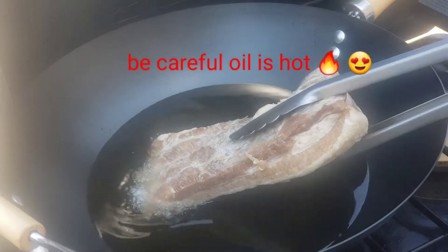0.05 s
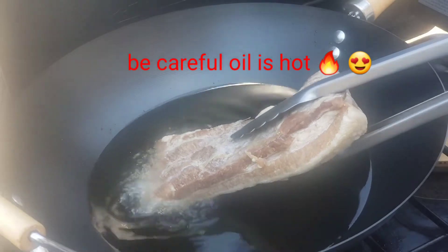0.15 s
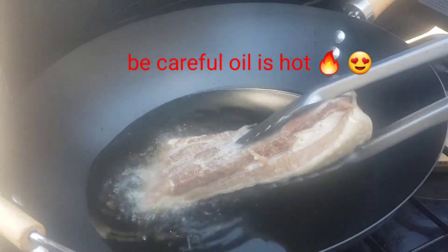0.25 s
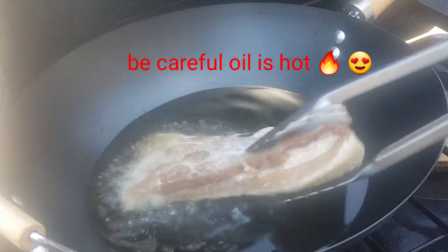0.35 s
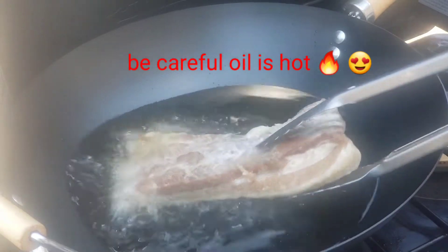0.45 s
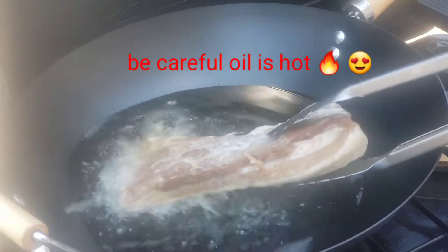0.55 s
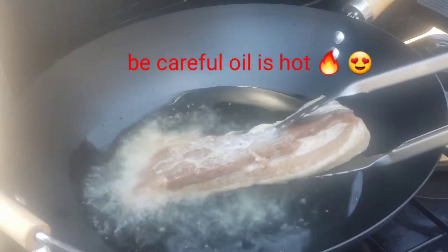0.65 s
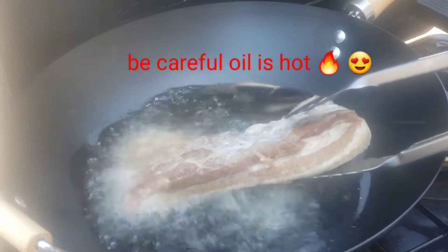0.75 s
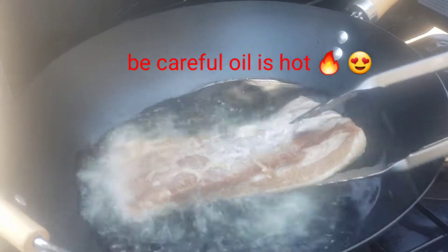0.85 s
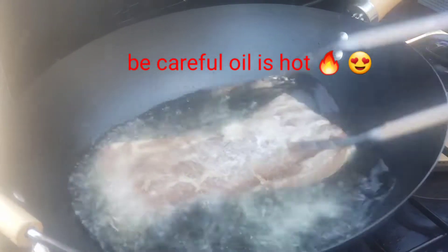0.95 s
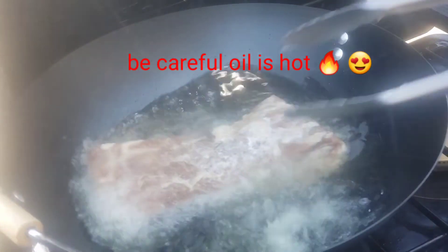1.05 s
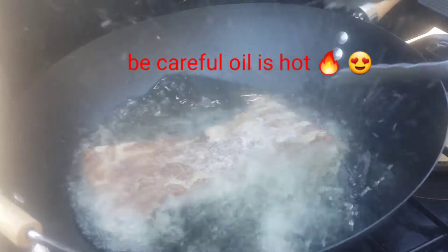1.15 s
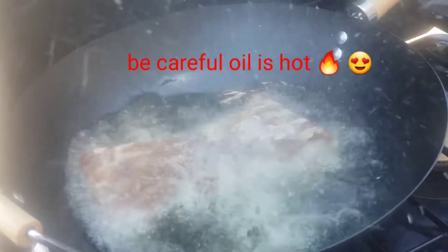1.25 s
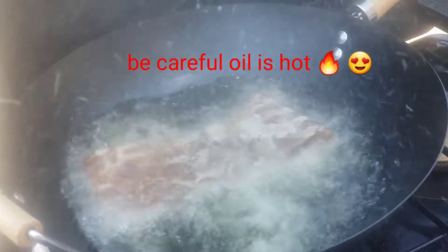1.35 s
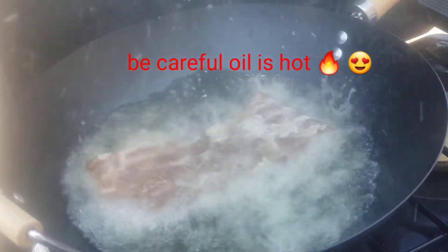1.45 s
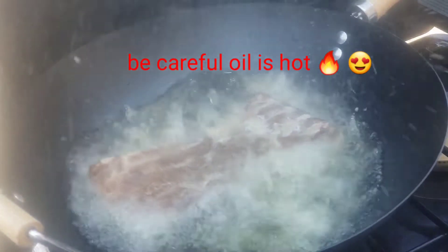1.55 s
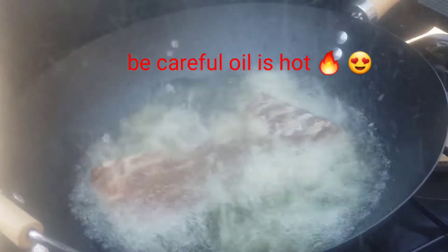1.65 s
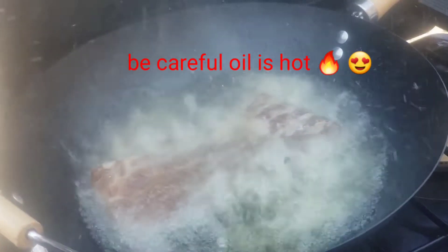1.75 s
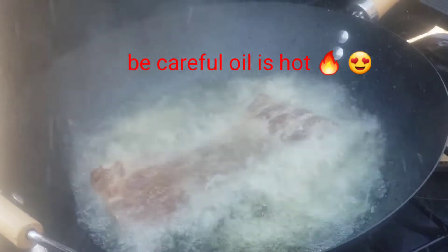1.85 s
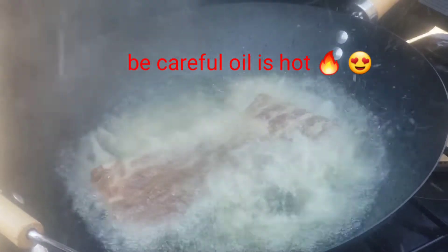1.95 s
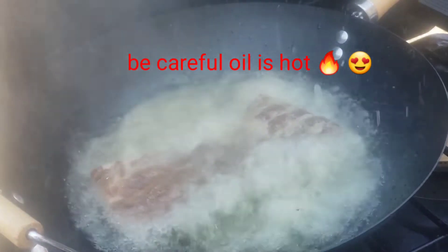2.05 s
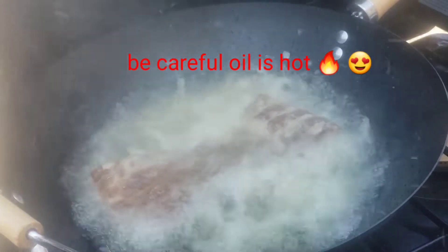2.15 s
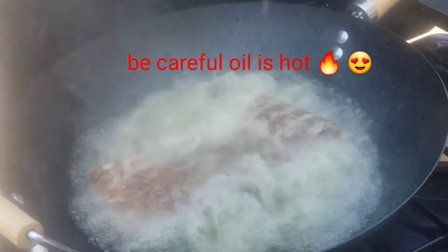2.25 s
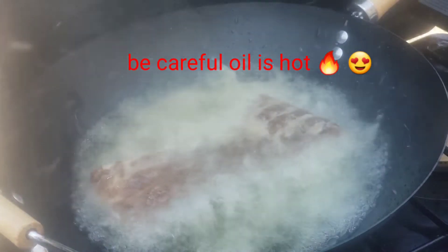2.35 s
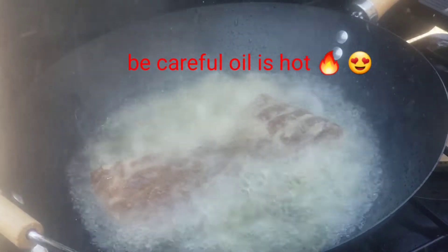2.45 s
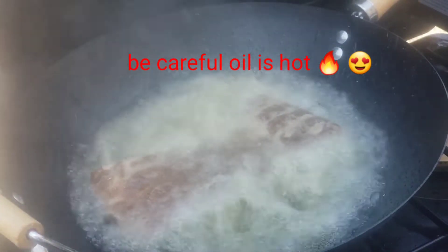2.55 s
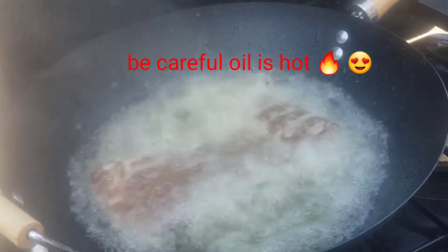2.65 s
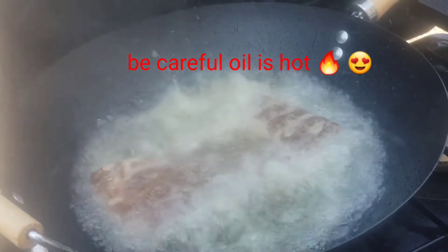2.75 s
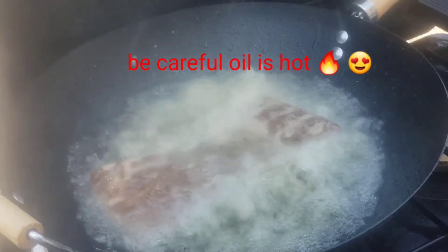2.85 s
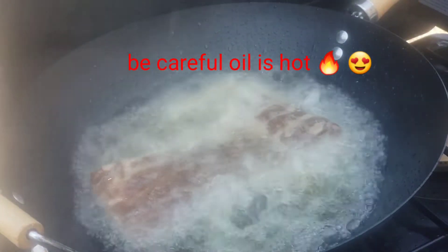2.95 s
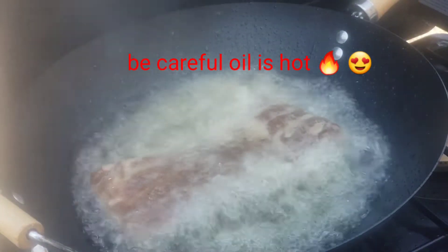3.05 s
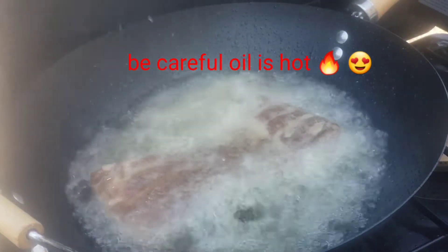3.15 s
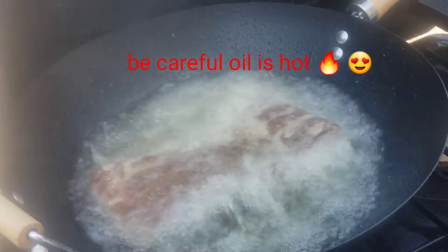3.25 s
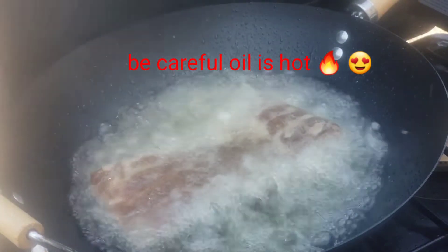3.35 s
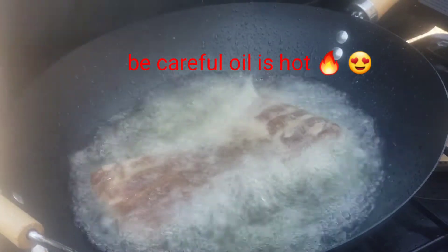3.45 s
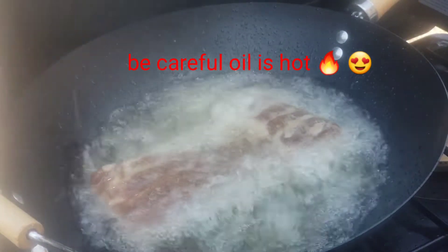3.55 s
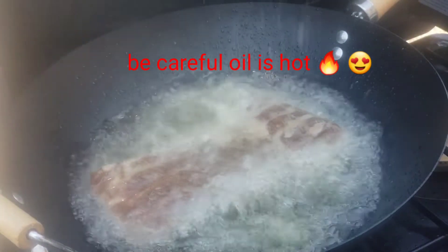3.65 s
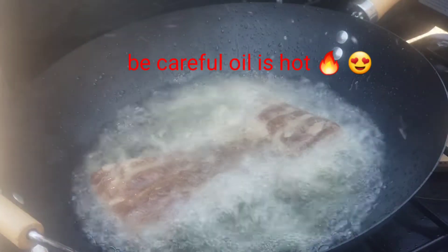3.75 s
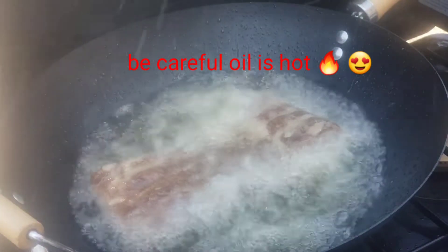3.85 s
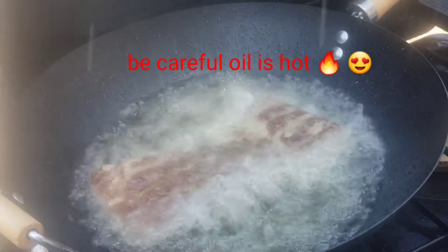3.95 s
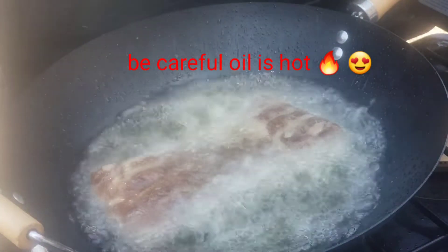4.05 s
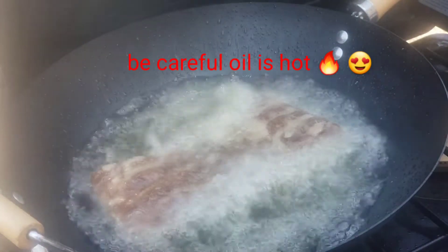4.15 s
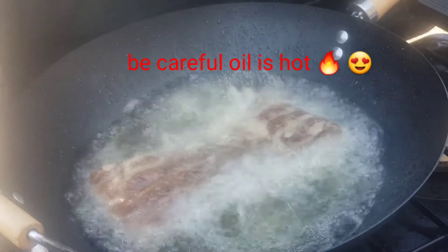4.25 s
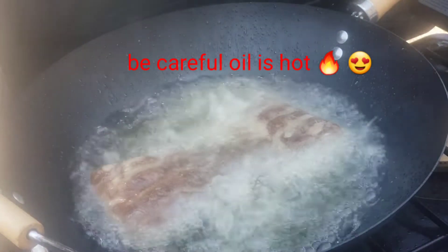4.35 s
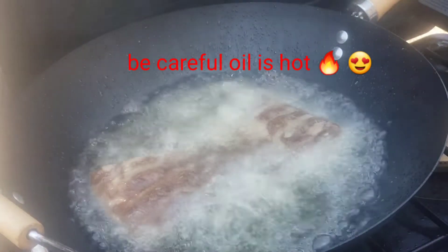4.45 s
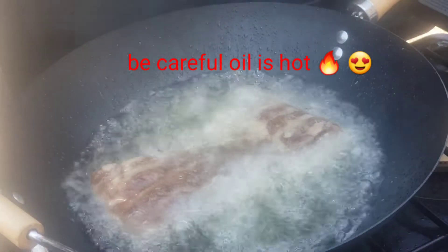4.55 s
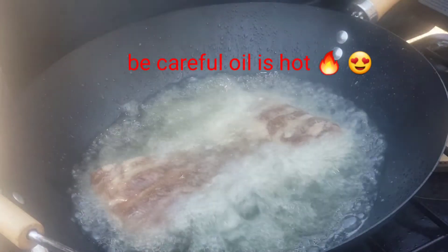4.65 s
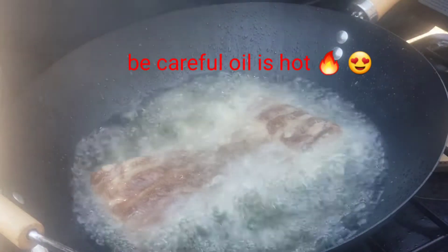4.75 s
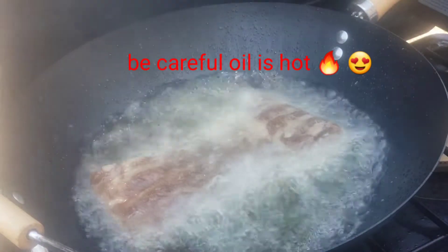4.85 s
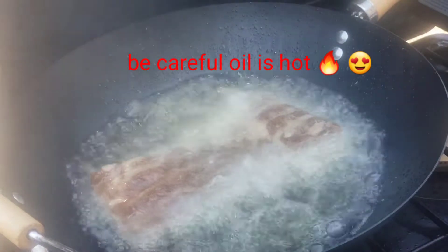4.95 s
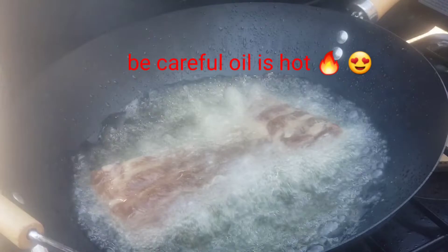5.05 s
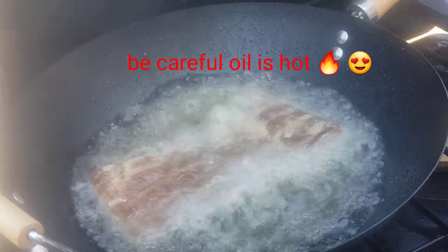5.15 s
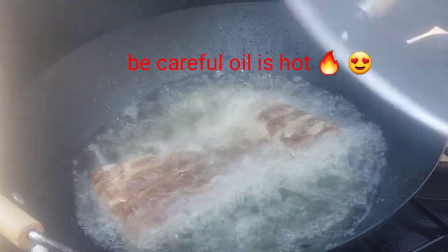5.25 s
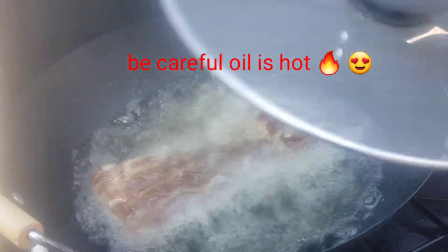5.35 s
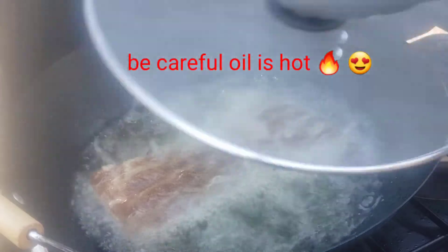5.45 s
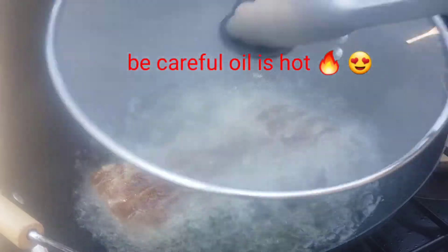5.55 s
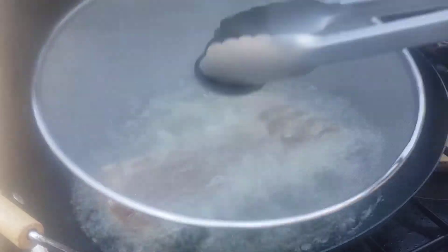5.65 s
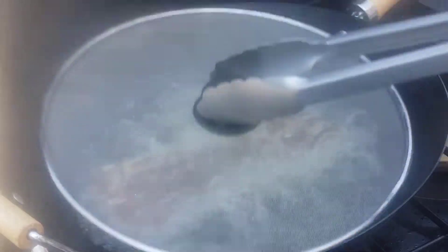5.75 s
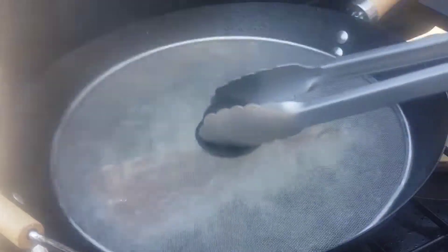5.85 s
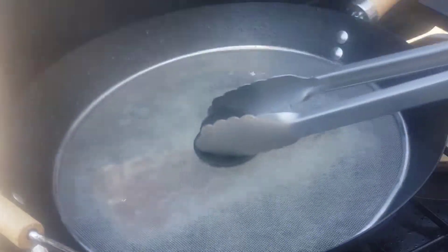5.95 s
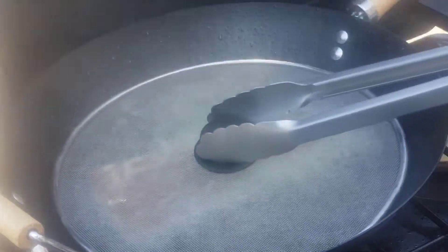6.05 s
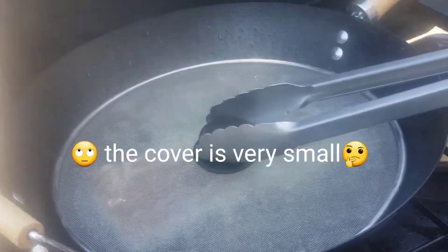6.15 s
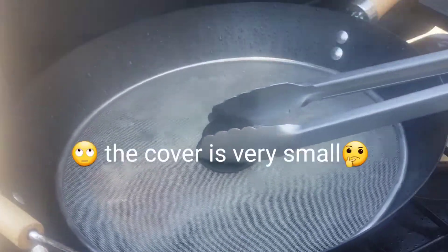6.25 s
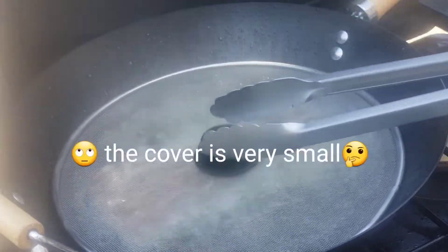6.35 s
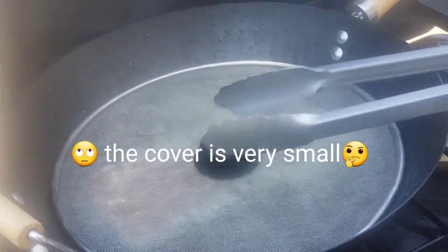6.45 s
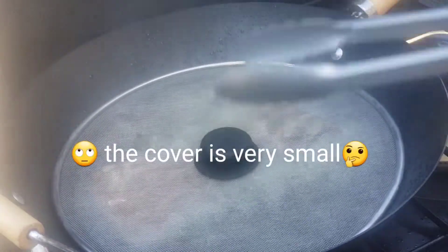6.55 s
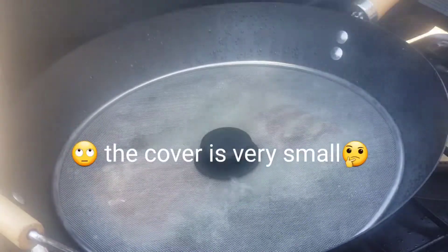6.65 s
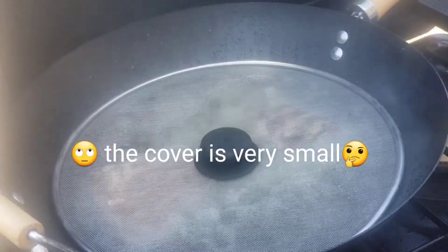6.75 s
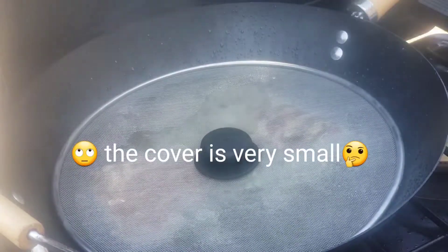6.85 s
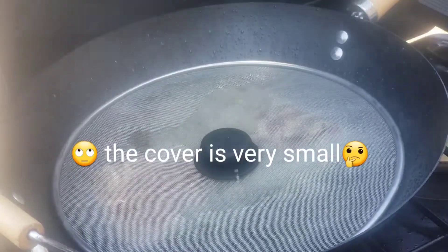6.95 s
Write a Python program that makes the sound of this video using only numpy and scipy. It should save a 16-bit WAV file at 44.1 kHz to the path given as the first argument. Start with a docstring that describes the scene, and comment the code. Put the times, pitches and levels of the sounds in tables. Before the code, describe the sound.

Close-miked frying in a small home kitchen. Hot oil hisses as wet pork touches it, then sizzles hard with dense high fizz and quick bubbling. The boil grows lower and rougher, with bright cracks and small low thumps from flying droplets. It then steadily dries out, leaving soft sizzle, single ringing pops, sharp snaps and a faint puff of low air rumble near the end.

```python
"""A wet slab of pork, lowered into a wok of hot oil close to the microphone, sizzles as its water boils.
The bright sizzle, built of noise, steam jets and swarms of decaying bubble tones, swells into a rolling
boil, then thins to single pops (ringing cavities with spray) and snaps (very short bursts of droplets).
The wok's resonances colour the frying, a small kitchen adds a short tail and air rumbles by the stove.
A few flying droplets thump on the microphone, and a limiter holds down the sharpest snaps."""
import sys
import numpy as np
from scipy import signal
from scipy.fft import rfft, irfft, next_fast_len
from scipy.io import wavfile
from scipy.ndimage import uniform_filter1d, minimum_filter1d, map_coordinates

SR = 44100
rng = np.random.default_rng(int(sys.argv[2]) if len(sys.argv) > 2 else 0)


def generate_wav(sig):
    """Save sig (samples, or channels by samples) to the path in sys.argv[1] as 16-bit PCM at SR."""
    pcm = np.round(np.clip(np.atleast_2d(sig).T, -1, 1) * 32767).astype(np.int16)
    wavfile.write(sys.argv[1], SR, pcm)


N = 308259  # samples

# Every level below is relative: each source adds its own offset.
# How hard the oil works: time_s, deep_boil_db, bubbling_db, fizz_db
OIL_ACTIVITY = [(0.0, -51, -26, -24.5), (0.17, -46, -39, -22), (0.51, -44.5, -33, -19.5),
                (0.59, -39, -21.5, -18.5), (0.8, -48, -20, -18), (1.0, -39, -23.5, -19),
                (1.3, -33, -20.5, -20), (1.65, -28, -20, -19.5), (1.93, -28.5, -21.5, -20),
                (2.3, -31.5, -23.5, -23.5), (2.52, -28, -21.5, -23), (2.92, -35, -23, -25),
                (3.25, -46, -30.5, -24.5), (3.62, -44, -26.5, -27.5), (4.17, -44.5, -34.5, -29.5),
                (4.83, -46.5, -36, -31), (5.3, -48, -33, -30.5), (5.66, -47.5, -43, -28),
                (6.01, -47.5, -38, -31.5), (6.99, -48, -43, -31.5)]
# Bubbles grow as the meat sinks and come more singly as it dries: time_s, pitch_hz, relative_scatter_db
FOAM_BUBBLES = [(0, 3030, -3), (.35, 2550, 0.5), (.8, 2110, 3.5), (1.5, 1860, 3), (2.7, 1514, 5),
                (3.6, 1980, 3.5), (5, 2010, 8), (7, 2280, 4.5)]
# The strongest steam jets spitting through the foam: start_s, level_db, pitch_hz
STEAM_JETS = [(0.2613, -6.5, 3400), (0.816, 2, 2580), (0.87, -10, 2760), (3.3277, -12.5, 2700),
              (3.4444, -15, 3450), (5.191, -12.5, 3000), (5.6068, -17.5, 3280), (6.3648, -13, 3340),
              (6.8833, -15.5, 2970)]
# The largest steam bubbles bursting: start_s, level_db, pitch_hz, spray_db (on top of level), life_cycles
BIG_BUBBLES = [(0.296, -5, 2200, -13, 17), (0.408, -13, 2010, -0.5, 17), (0.4233, 3, 2580, -19, 8.7),
               (0.4495, -8, 1890, -17, 19), (0.4643, -1, 2380, -28, 17), (0.5803, -12, 1210, -3, 22),
               (0.6542, -7, 2020, -7, 12), (0.7496, -6, 1220, -4, 21), (0.7835, 2, 1990, -10, 8),
               (0.8405, -14, 1700, 3, 11), (0.915, -9, 1620, -13, 21), (0.9977, 2.5, 1330, 0, 17),
               (1.0672, -8, 1240, -4, 21), (1.2246, -8, 1070, -11, 9.6), (1.6571, -11, 660, -7, 8.3),
               (1.8927, -8, 650, -8, 5.9), (1.9111, -9.5, 680, -7, 7.9), (1.9933, 3, 1210, -9, 7.8),
               (2.277, -13, 1680, 6, 7.2), (2.5654, -2, 1100, -16, 7.4), (2.6137, -4, 1070, -22, 13),
               (2.7251, -7, 1140, -11, 17), (2.8287, -6, 1120, -18, 10), (3.071, -1, 890, -11, 6.1),
               (3.0973, -8.5, 1420, -4, 6.5), (3.256, -6.5, 663, -8, 7.1), (3.4909, -13, 1500, -3.5, 7.6),
               (3.5168, -9, 1390, -4.5, 9), (3.5487, -12, 1500, -12, 14), (3.6674, -10.5, 840, -8, 10),
               (3.988, -13.5, 1120, -0.5, 23), (4.0531, -12, 850, -16, 5.3), (4.111, -13.5, 1900, -5.5, 9),
               (4.1456, -12, 1420, -8, 9), (4.2935, -14.5, 1045, -13, 23), (4.3173, -4.5, 760, -12, 7),
               (4.333, -2, 500, -8.5, 8.8), (4.3572, -12, 1380, -5, 9.2), (4.5183, -9, 1020, -6.5, 7.2),
               (4.5965, -8.5, 1300, -12, 9.7), (4.6042, -8.5, 746, -5, 12), (4.7988, -13, 1200, -4.5, 11),
               (4.8224, -16.5, 676, -3.5, 11), (4.9617, -2, 1160, -13.5, 2.8), (5.062, -7, 1220, -8, 11.4),
               (5.1056, -10.5, 1860, -8, 14), (5.2474, -14, 1164, 1.5, 22), (5.4235, -10.5, 950, -18, 8.1),
               (5.4495, -10, 2600, -20, 18), (5.4865, -10.5, 1144, -6.5, 16),
               (5.7868, -5.5, 1000, -12.5, 8.8), (5.883, -19, 1560, 1.5, 11), (6.0006, -7, 1280, -10, 3.5),
               (6.092, -12, 1400, -7.5, 6.1), (6.1355, -14, 1750, -13, 9.8), (6.1744, -16, 1400, -7, 14),
               (6.3557, -17, 950, -20, 10.5), (6.4089, -9, 760, -9, 15), (6.4663, -9, 1360, -10.5, 21),
               (6.5274, -3.5, 1050, -14, 17), (6.63, -16.5, 1910, 0.5, 12), (6.688, -8.5, 1190, -4.5, 19),
               (6.81, -6.5, 1150, -6.5, 16), (6.9511, -9, 1900, -7.5, 18)]
# The loudest water droplets exploding at the surface: start_s, level_db, pitch_hz
BURSTING_DROPLETS = [(0.277, -3, 8350), (0.7982, -5, 6860), (1.1915, 8, 7600), (1.2667, 11, 8200),
                     (1.3085, 9, 7900), (1.3576, -7, 6100), (1.8037, 7, 6740), (1.9432, 5, 7900),
                     (2.3112, -2, 4800), (2.3673, -5, 5500), (2.4522, 5, 7600), (2.534, -3, 5850),
                     (2.8545, -5.5, 6440), (2.8837, 3, 7650), (3.2346, -5, 7500), (3.4363, -2, 6200),
                     (4.0292, -10, 7940), (4.0372, -9, 7700), (4.1286, -10.5, 6250), (4.2061, -8, 8500),
                     (4.4738, -12, 8040), (4.5418, -11, 7640), (4.7861, -9.5, 7540), (5.3589, -8, 10700),
                     (5.406, -8, 11100), (5.5001, -12.5, 4380), (5.5197, -4, 10000), (5.556, -12, 5600),
                     (6.0095, 1, 6900), (6.0276, -11.5, 7450), (6.1728, -3, 7300), (6.3243, -13.5, 5430),
                     (6.394, -6, 8450), (6.5034, -2, 6300), (6.7197, -13, 7500), (6.7654, -9, 7300),
                     (6.7782, -2, 7940)]
# Flying droplets that land on the microphone: start_s, thump_db
DROPLET_IMPACTS = [(0.556, -37), (1.178, -33), (1.272, -36), (1.359, -40), (1.944, -37), (2.039, -37),
                   (2.403, -35), (2.855, -24.5), (2.884, -36), (3.235, -43), (3.436, -41), (4.038, -32),
                   (4.786, -42), (5.517, -38), (6.01, -35)]
# Rumble of the air around the stove: time_s, level_db
AIR_LEVEL = [(0.0, -67), (0.21, -72), (2.1, -61), (3.56, -83), (5.98, -64), (6.13, -64), (6.64, -51),
             (6.99, -67.5)]

# Spectra of the steam hiss, fine fizz, deep boil and air rumble: frequency_hz, gain_db
HISS_SPECTRUM = [(100, -43), (400, -8.5), (750, -22), (1100, -4.5), (2000, 0), (2800, 3.5), (3500, 1),
                 (4400, 4), (6000, 0), (8200, 0), (10000, -11.5), (12500, -17), (15500, -35)]
FIZZ_SPECTRUM = [(300, -18), (1000, -17), (2000, 5), (3000, -16), (4400, -8), (6000, 2), (8200, 3),
                 (10000, -1.5), (12500, -14), (15500, -30)]
BOIL_SPECTRUM = [(20, -36), (70, -4.5), (160, -4), (350, -6), (560, -4.5), (800, -1.5), (1200, 4.5),
                 (2500, -20), (8000, -45)]
RUMBLE_SPECTRUM = [(15, -8), (35, 0), (62, 5), (85, -0.5), (120, -12), (250, -18), (600, -25), (3000, -60)]
# Colour of the steam wisp behind a snap: frequency_hz, gain_db
WISP_SPECTRUM = [(200, -33), (1000, -4.5), (2000, -5), (4400, -2.5), (8200, 7.5), (10000, -0.5),
                 (12500, -8.5), (15500, -34)]
# Colours of the spatter, the burbling foam, a pop's ring and its spray: frequency_hz, gain_db
SPATTER_SPECTRUM = [(500, -14), (4000, 0.5), (9000, -4.5)]
BURBLE_SPECTRUM = [(250, -17.5), (750, -4.0), (1100, -4.0)]
CAVITY_SPECTRUM = [(120, -11), (330, -3), (550, 0)]
SPRAY_SPECTRUM = [(200, -9.5), (1500, 17.5), (5000, 10.0), (8000, 4.5), (15000, -28)]

# Resonances of the wok and the air in its bowl: centre_hz, width_hz, level_db
WOK_MODES = [(460, 70, -20), (588, 112, -1), (1155, 170, -7), (4350, 78, -11)]
# How long the kitchen rings, by frequency: frequency_hz, t60_s
KITCHEN_DECAY = [(200, 0.4), (1200, 0.13), (5000, 0.064), (15000, 0.093)]

TOP_HZ = 15750  # upper band limit
SUNK_S = 0.55  # the meat goes under and the oil starts to bubble


def sizzle():
    """Vaporisation: steam leaves in spurts; tiny bubbles fizz, larger ones burble, the largest churn the oil."""
    boil_db, bubble_db, fizz_db = curves(OIL_ACTIVITY)
    spurt = wobble(rate=170)
    # the finest fizz and the spatter need a wet surface, so they fade faster than the hiss
    wet_db = fizz_db + 0.45 * (fizz_db + 20)
    layers = hiss(spurt, fizz_db) + fizz(spurt, wet_db) + spatter(wet_db)
    layers = layers + bubbles(spurt, bubble_db) + boil(boil_db)
    return layers + sputter(count=1300) * amp(fizz_db - 3.5)


def hiss(spurt, fizz_db):
    """Turbulence: escaping steam makes broadband noise, uneven in time and frequency."""
    steam = unit(patchy(coloured(rng.standard_normal(N), HISS_SPECTRUM), depth_db=3.0))
    flutter = amp(0.9 * spurt + 1.8 * wobble(rate=53))
    return steady(steam * flutter) * amp(fizz_db - 1.83)


def fizz(spurt, wet_db):
    """Resonance of tiny bubbles: a dense swarm of high tones merges into a fizz."""
    crackle = swarm(7000, octaves=1.5, life=9.9, scatter_db=6.5, count=14000, size=40)
    return steady(coloured(crackle, FIZZ_SPECTRUM) * amp(2.8 * spurt)) * amp(wet_db - 6.5)


def spatter(wet_db):
    """Impulsive radiation: sparse, quickly damped high tones are heard as ticks."""
    ticks = swarm(8400, octaves=0.62, life=3.8, scatter_db=2.5, count=560, size=60)
    return coloured(ticks, SPATTER_SPECTRUM) * amp(wet_db - 4.5)


def bubbles(spurt, bubble_db):
    """Bubble resonance: the larger the bubble, the lower its pitch, so growing foam burbles lower."""
    bubble_hz, scatter_db = curves(FOAM_BUBBLES)
    burble = swarm(bubble_hz, octaves=1.074, life=13.7, scatter_db=0.69 * scatter_db, count=5000, size=400)
    burble = coloured(burble, BURBLE_SPECTRUM)
    return steady(burble * amp(1.8 * spurt + 2.7 * wobble(rate=96))) * amp(bubble_db - 2.5)


def boil(boil_db):
    """Bubble resonance at large size: low, strongly damped tones churn the oil."""
    scatter_db = curves(FOAM_BUBBLES)[1]
    churn = swarm(644, octaves=1.34, life=5.0, scatter_db=0.81 * scatter_db, count=2400, size=700)
    return steady(coloured(churn, BOIL_SPECTRUM)) * amp(boil_db)


def sputter(count):
    """Jet noise: many small steam jets sound, each at a pitch of its own."""
    s = rng.uniform(0, N / SR, count)
    hz = np.minimum(4200 * 2 ** (0.64 * rng.standard_normal(count)), 8500)
    strength = amp(3.0 * np.minimum(rng.exponential(size=count), 3))
    jets = strength[:, None] * jet(hz, swell=0.00094, width=0.57)
    return steady(place(s, jets), size=12000)


def spits():
    """Jet noise: stronger steam jets stand out of the sizzle."""
    s, db, hz = np.vstack([STEAM_JETS, small_spits(count=90)]).T
    return place(s, amp(db - 2)[:, None] * jet(hz, swell=0.0012, width=0.96))


def pops():
    """Cavity resonance: a big bubble tears open with a tick, rings for a few cycles and throws a short spray."""
    s, db, hz, spray_db, life = np.vstack([BIG_BUBBLES, small_pops(count=80)]).T
    t = np.arange(3600) / SR
    tone = ring(hz, life, onset=0.5, rise=0.018, size=len(t)) * amp(db + 6)[:, None]
    # the spray dies over milliseconds, the tick much faster
    decay = np.exp(-t / 0.0039) + 1.03 * np.exp(-t / 0.00031)
    tear = rng.standard_normal(tone.shape) * decay * amp(db + spray_db - 6.5)[:, None]
    spray = filtered(place(s, tear), lambda hz: amp(along(SPRAY_SPECTRUM, hz)))
    cavity = filtered(place(s - 0.0002, tone), lambda hz: amp(along(CAVITY_SPECTRUM, hz)))
    return cavity + spray


def snaps():
    """Explosive boiling: a droplet bursts in a brief crack, sharper at higher pitch, trailing a wisp of steam."""
    s, db, hz = np.vstack([BURSTING_DROPLETS, small_snaps(count=115)]).T
    t = np.arange(400) / SR
    life = 8 * (6500 / hz) ** 2  # cycles
    crack = ring(hz, life, onset=0.43, rise=0.066, size=len(t)) * (hz / 6500)[:, None]
    decay = 0.35 * np.exp(-t / 0.0007) + 0.067 * np.exp(-t / 0.0019)
    wisp = rng.standard_normal(crack.shape) * decay
    strength = amp(db + 13.0)[:, None]
    steam = filtered(place(s, strength * wisp), lambda hz: amp(-2.5 + along(WISP_SPECTRUM, hz)))
    return place(s, strength * crack) + steam


def small_spits(count):
    """Steam supply: lesser jets come at an even pace and weaken with the fizz; rows like STEAM_JETS."""
    s, db = chance(curves(OIL_ACTIVITY)[2], crowding=0, level_db=-16.5, follow=0.64, scatter_db=3.5,
                   count=count, start_s=0.2)
    return np.column_stack([s, db, 3400 * 2 ** (0.78 * rng.uniform(-1.1, 1, count))])


def small_pops(count):
    """Size sets pitch: lesser bursts follow the bubbling, a little larger than the foam; rows like BIG_BUBBLES."""
    s, db = chance(curves(OIL_ACTIVITY)[1], crowding=0.6, level_db=-16.5, follow=0.56, scatter_db=4.5,
                   count=count, start_s=SUNK_S)
    size, spray, damping = rng.uniform(-1.11, 1, (count, 3)).T
    foam_hz = np.interp(s, *np.transpose(FOAM_BUBBLES)[:2])
    hz = 0.78 * foam_hz * 2 ** (0.57 * size)
    return np.column_stack([s, db, hz, -6.0 + 2.7 * spray, 16.5 * 2 ** (0.45 * damping)])


def small_snaps(count):
    """Ejection: the boil throws up lesser droplets; rows like BURSTING_DROPLETS."""
    s, db = chance(curves(OIL_ACTIVITY)[0], crowding=0.6, level_db=-13.5, follow=0.73, scatter_db=4.5,
                   count=count, start_s=0.16)
    return np.column_stack([s, db, 6400 * 2 ** (0.34 * rng.uniform(-1.1, 1, count))])


def chance(drive_db, crowding, level_db, follow, scatter_db, count, start_s=0):
    """Random arrivals: as the drive grows, events come denser (crowding) and louder (follow)."""
    effort_db = drive_db - drive_db.mean()
    due = np.cumsum(amp(crowding * effort_db) * (np.arange(N) >= start_s * SR))
    slot, luck = rng.random((count, 2)).T
    # one event in each equal share of the accumulated rate
    at = np.searchsorted(due / due[-1], (np.arange(count) + slot) / count)
    return at / SR, level_db + follow * effort_db[at] + scatter_db * (2 * luck - 1)


def swarm(centre_hz, octaves, life, scatter_db, count, size):
    """Superposition: many bubbles at random moments, most faint and a few strong, spread about the centre."""
    at = rng.integers(0, N, count)
    hz = np.broadcast_to(centre_hz, N)[at] * 2 ** (octaves * rng.triangular(-1, 0, 1, count))
    level_db = np.broadcast_to(scatter_db, N)[at] * np.minimum(rng.exponential(size=count), 4.5)
    strength = amp(level_db) * rng.choice([-1, 1], count)
    tones = ring(np.minimum(hz, TOP_HZ), life, onset=0.34, rise=0.021, size=size)
    return place(at / SR, strength[:, None] * tones)


def ring(hz, life, onset, rise, size):
    """Damped oscillation: tones swell over onset cycles, fall 60 dB in life cycles and rise in pitch."""
    cycles = hz[:, None] * np.arange(size) / SR
    age = cycles / np.reshape(life, (-1, 1))
    envelope = np.exp(-np.log(1000) * age) * (1 - np.exp(-cycles / onset))
    return np.sin(2 * np.pi * cycles * (1 + rise * age)) * envelope


def jet(hz, swell, width, size=560):
    """Filtered turbulence: noise in a resonance of relative width, its envelope peaking near swell seconds."""
    f, centre = np.fft.rfftfreq(size, 1 / SR), hz[:, None]
    loss = 1j * f * centre * width
    band = loss / (centre ** 2 - f ** 2 + loss)
    noise = irfft(rfft(rng.standard_normal((len(hz), size))) * band ** 2, size)
    u = np.arange(size) / SR / (swell * rng.lognormal(0, 0.11, (len(hz), 1)))
    return noise / noise.std(axis=1, keepdims=True) * u * np.exp(1 - u)


def patchy(x, depth_db):
    """Random modulation: the level scatters in patches some milliseconds long and about a kilohertz wide."""
    z = signal.stft(x, nperseg=128)[2]
    field = uniform_filter1d(rng.standard_normal(z.shape), size=5, axis=0)
    field = uniform_filter1d(field, size=5, axis=1)
    return signal.istft(z * amp(depth_db * unit(field)), nperseg=128)[1][:N]


def thumps(low_hz=55, high_hz=130):
    """Pressure leakage: each droplet on the microphone gives a soft push that swings back."""
    s, db = np.transpose(DROPLET_IMPACTS)

    def port(f):
        return (1j * f / (low_hz + 1j * f)) ** 3 / (1 + 1j * f / high_hz) ** 4

    return filtered(place(s, amp(db + 56.5)[:, None]), port)


def wok(x, low_hz=170):
    """Resonance and reflection: the bowl rings, its wall returns a dull echo, and bubbles radiate little bass."""
    def bowl(f):
        return 1 + sum(amp(db) * 1j * f * w / (c * c - f * f + 1j * f * w) for c, w, db in WOK_MODES)

    def wall(f):
        return 1 + 0.04 * np.exp(-2j * np.pi * f * 0.00267) / (1 + 1j * f / 2200)

    return filtered(x, lambda f: amp(-1.46) * bowl(f) * wall(f) * 1j * f / (low_hz + 1j * f))


def kitchen(x):
    """Reverberation: a short diffuse tail whose decay time depends on frequency, longest in the bass."""
    hz, t, z = signal.stft(rng.standard_normal(SR // 3), SR, nperseg=256)
    decay = np.exp(-np.log(1000) * t / along(KITCHEN_DECAY, hz)[:, None])
    tail = signal.istft(z * decay, SR, nperseg=256)[1]
    delayed = np.pad(tail, (SR // 200, 0))  # 5 ms
    return signal.fftconvolve(x, delayed / np.linalg.norm(tail))[:N]


def rumble():
    """Air flow: low noise comes in uneven puffs as air moves by the stove."""
    puffs = coloured(rng.standard_normal(N), RUMBLE_SPECTRUM) * amp(2.8 * wobble(rate=18))
    return unit(puffs) * amp(curves(AIR_LEVEL)[0] + 2.5)


def amp(db):
    """Logarithmic level: decibels to amplitude gain."""
    return 10 ** (np.asarray(db) / 20)


def unit(x):
    """Mean power: x scaled to rms 1."""
    return x / np.sqrt(np.mean(x ** 2) + 1e-20)


def steady(x, size=6000):
    """Short-term power: x with its slow level evened out to rms 1 over size samples."""
    return x / np.sqrt(np.abs(uniform_filter1d(x ** 2, size)) + 1e-9)


def along(points, hz):
    """Logarithmic pitch: (Hz, value) points read on a log frequency axis."""
    f, v = np.transpose(points)
    return np.interp(np.log(hz + 1), np.log(f), v)


def curves(rows):
    """Linear interpolation: one value per sample for each column after the time."""
    s, *cols = np.transpose(rows)
    return [np.interp(np.arange(N) / SR, s, c) for c in cols]


def wobble(rate):
    """Slow fluctuation: a random curve with straight lines between rate knots a second."""
    return map_coordinates(rng.standard_normal(4096), [np.arange(N) * rate / SR], order=1, mode="wrap")


def filtered(x, response):
    """Linear filtering: the spectrum of x times a complex response of frequency."""
    m = next_fast_len(N + SR // 4)
    return irfft(rfft(x, m) * response(np.fft.rfftfreq(m, 1 / SR)), m)[:N]


def coloured(x, spectrum):
    """Spectral shaping: x through a (Hz, dB) spectrum, at rms 1."""
    return unit(filtered(x, lambda hz: amp(along(spectrum, hz))))


def place(starts, sounds):
    """Superposition: the sum of rows of sound, each from its start in seconds."""
    index = np.round(np.abs(starts) * SR).astype(int)[:, None] + np.arange(sounds.shape[1])
    return np.bincount(index.ravel(), sounds.ravel(), N)[:N]


def scene():
    """Superposition of the frying in its wok, the room's tail, the droplet thumps and the air rumble."""
    pan = wok(sizzle() + spits() + pops() + snaps())
    return (pan + amp(-15.5) * kitchen(pan) + thumps() + rumble())[None]


def limiter(x, ceiling_db, size=90):
    """Gain reduction: the level ducks for a few milliseconds around every peak above the ceiling."""
    needed = np.minimum(1, amp(ceiling_db) / (np.abs(x) + 1e-9))
    return x * uniform_filter1d(minimum_filter1d(needed, 2 * size), size)


def record(dry):
    """Peak limiting, then band limiting: nothing passes from TOP_HZ up."""
    return filtered(limiter(dry[0], ceiling_db=-1.27), lambda hz: hz < TOP_HZ)[None]


dry = scene()
out = record(dry)
generate_wav(out)
```